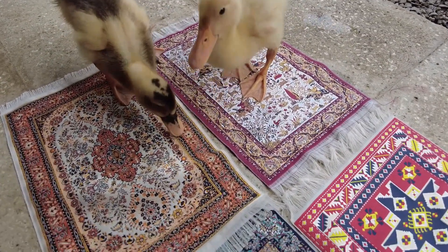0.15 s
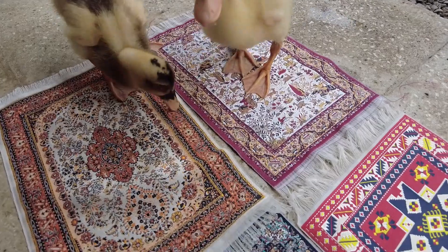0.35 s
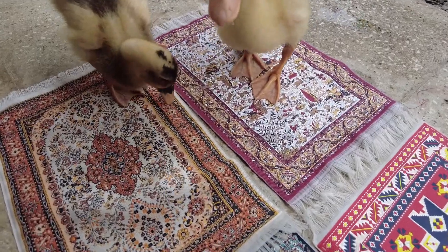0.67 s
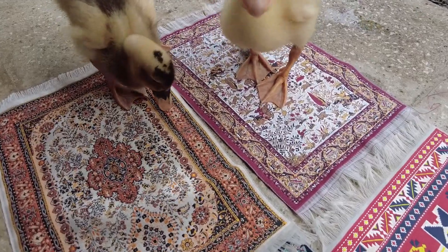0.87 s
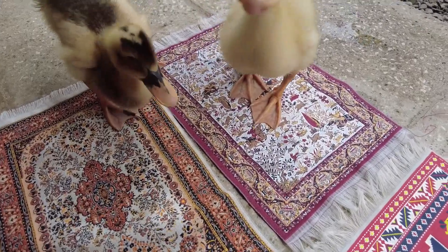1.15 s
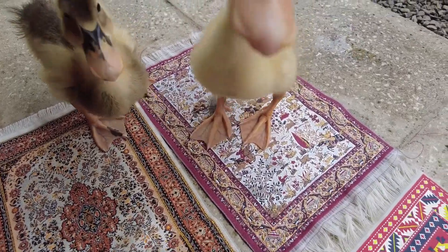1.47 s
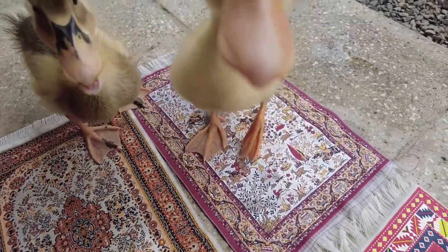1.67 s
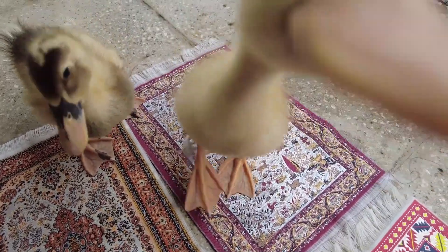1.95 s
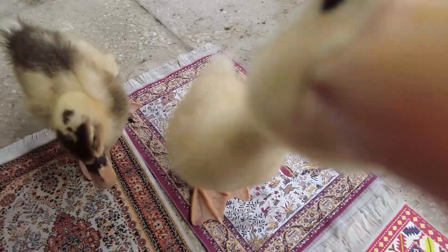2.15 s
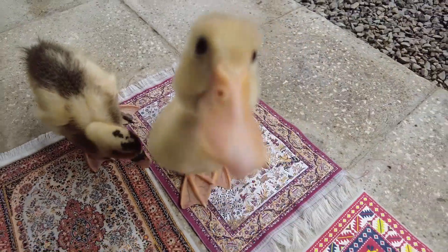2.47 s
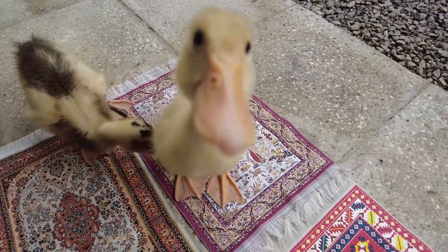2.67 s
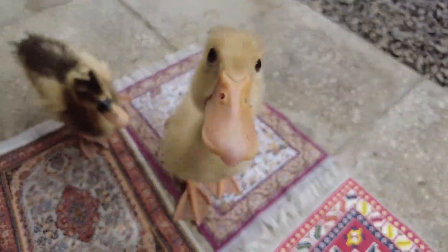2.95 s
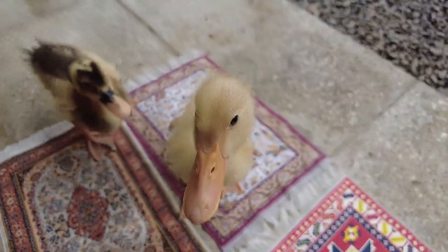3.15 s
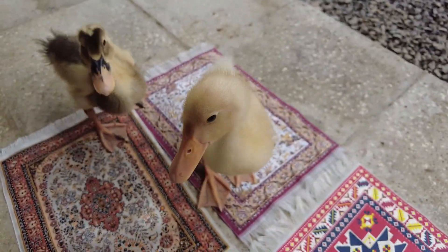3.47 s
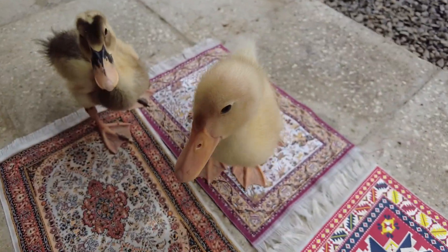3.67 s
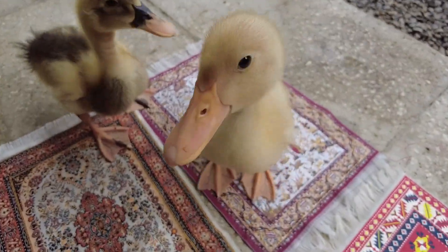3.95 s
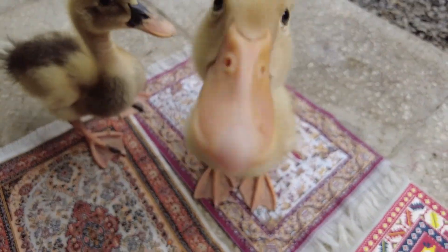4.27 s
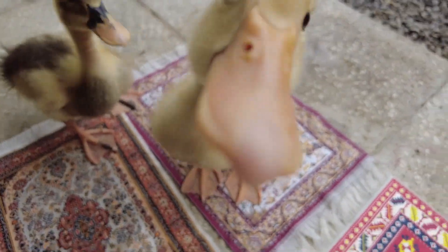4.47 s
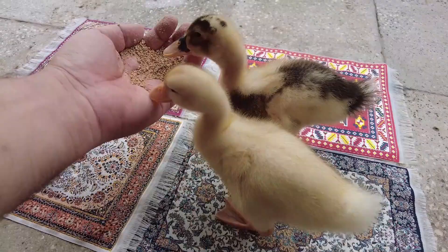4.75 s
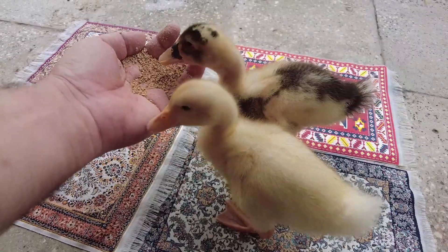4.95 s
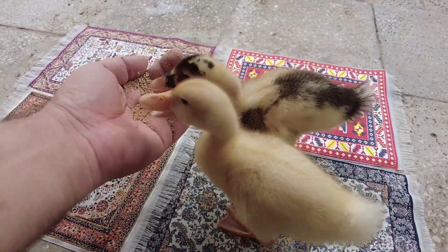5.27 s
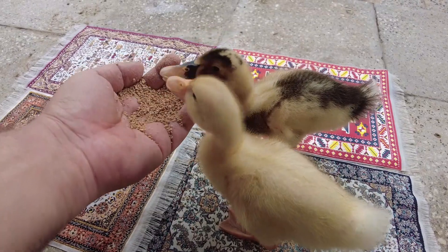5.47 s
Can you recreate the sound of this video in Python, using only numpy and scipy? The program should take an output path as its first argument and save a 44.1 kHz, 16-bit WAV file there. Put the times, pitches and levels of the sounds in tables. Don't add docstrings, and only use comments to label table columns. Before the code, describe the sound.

Rapid high duckling peeps, a knock on the phone, gentler scattered peeps with bill taps and rug rustles, then only faint breeze.

```python
import sys
import numpy as np
from scipy import signal
from scipy.fft import rfft, irfft, next_fast_len
from scipy.io import wavfile
from scipy.ndimage import uniform_filter1d

SR = 44100
rng = np.random.default_rng(int(sys.argv[2]) if len(sys.argv) > 2 else 0)


def elevation(decibels):
    levels = np.asarray(decibels, float)
    return 10 ** (levels / 20)


def dump_mix(stems):
    frames = np.atleast_2d(stems).T
    limited = np.clip(frames, -1, 1)
    pcm = np.round(limited * 32767).astype(np.int16)
    wavfile.write(sys.argv[1], SR, pcm)


N = 247842

# time_s, level_db
BREEZE = [(0.0, -68.5), (0.06, -50), (0.2, -63), (0.31, -52), (1.45, -47), (1.63, -53.5), (1.81, -47.5),
          (2.94, -50), (2.99, -46.5), (3.93, -51), (4.04, -39.5), (4.62, -58), (4.73, -45.5), (4.85, -53),
          (5.24, -53), (5.31, -49.5), (5.59, -57), (5.62, -62)]
# time_s, level_db
TRAFFIC = [(0, -57.5), (.6, -57.5), (1.95, -58.5), (2.11, -53.5), (2.2, -59), (2.45, -62), (3.07, -57),
           (3.6, -57.5), (3.72, -53.5), (3.88, -57), (5.62, -59.5)]
# freq_hz, level_db_per_hz
YARD_COLOUR = [(47, -42.5), (80, -3), (177, -6.5), (228, -9), (268, -11.5), (316, -15), (868, -22.5),
               (1080, -24), (1410, -17.5), (2140, -25), (3080, -28), (3620, -30), (6000, -39.5),
               (7800, -70.5), (13200, -120)]
# peak_s, peak_db, rise_db_per_s, fade_db_per_s
RUSTLES = [
    (.25, -75, 56.5, 11),
    (1.45, -72.5, 25.5, 43.5),
    (1.86, -70.5, 33.5, 110.5),
    (2.13, -67.5, 202.5, 200),
    (2.225, -63, 249.5, 249.5),
    (3.029, -61.5, 246.5, 53.5),
    (3.58, -65, 90, 60),
    (3.719, -71.5, 82.5, 132.5),
    (5.12, -80, 8, 87.5),
]
# freq_hz, level_db_per_hz
RUSTLE_COLOUR = [(3500, -5.5), (5000, -3), (7500, -3.5), (10000, -10), (13000, -14.5), (15500, -5.5)]
# freq_hz, likeness_0_1
LIKENESS = [(60, 0.952), (180, 0.95684), (550, 0.11), (1650, 0.33), (5000, 0.026), (8000, 0.092),
            (13000, 0.32)]
# start_s, end_s, start_hz, end_hz, level_db
FAR = [
    (0.3, 0.6047, 253.1, 247.2, -65),
    (1.0, 1.548, 247.2, 252, -59.5),
    (2.35, 3.4, 174, 168, -58),
    (4.94, 5.21, 3380, 3480, -70),
    (0, 5.62, 99, 100, -58.5),
    (0.037, 0.08316, 4300, 2300, -61),
    (1.035, 1.06, 5600, 5100, -70),
    (1.755, 1.82, 5440, 4760, -69.5),
]
# start_s, end_s, start_hz, end_hz, level_db
SCUFFS = [
    (5.04, 5.09, 1500, 1500, -59),
    (3.54, 3.65, 1500, 1200, -56),
]
# start_s, peak_db, ring_hz, t60_s
POPS = [
    (0.267, -47.5, 510.8, 0.055),
    (0.849, -44.5, 479.4, 0.06107),
    (1.229, -38, 473.6, 0.03147),
    (1.613, -39, 449.9, 0.026427),
    (1.711, -52, 499.3, 0.0722),
    (2.621, -42, 1461, 0.02709),
    (2.79, -50.5, 470.5, 0.03926),
    (4.569, -35.5, 1348, 0.0054),
    (4.743, -41, 1433, 0.01672),
]
# start_s, peak_db
TICKS = [(2.0951, -39.5), (2.3029, -36), (2.994, -36), (3.0205, -38), (3.0245, -33.5), (3.052, -35),
         (3.171, -45.5), (3.2095, -35), (3.237, -47), (3.383, -52.5), (3.489, -52.5), (2.6155, -57),
         (2.6215, -57.5), (3.657, -36), (3.696, -44.5), (3.7244, -32), (3.748, -35), (4.5665, -57.5),
         (4.571, -52), (4.7384, -61.5), (4.7425, -53.5), (4.8208, -47)]
# start_s, peak_db
CLAPS = [(3.652, -36), (3.6575, -27), (3.668, -40), (3.693, -44.5), (3.725, -36), (3.726, -27),
         (3.737, -32.5), (3.746, -36.5), (3.7476, -26), (2.122, -51), (3.549, -44)]
# ring_hz, level_db, t60_s
KNOCK = [
    (433.24, 2.5, 0.024975),
    (266.72, -12.5, 0.06914),
    (565, -56, 0.039),
    (109.01, -33.5, 0.0574),
    (1330.4, -16, 0.05937),
]
# start_s, end_s, first_hz, top_hz, crest_db
LARGER = [(0, 0.038, 3145, 3211, -52.5), (0.106, 0.209, 2317, 4207, -40.5),
          (0.267, 0.359, 2605, 3807, -27.5), (0.471, 0.546, 2041, 4200, -38.5),
          (0.677, 0.753, 2395, 4237, -38.5), (0.852, 0.937, 2534, 4396, -33.5),
          (1.063, 1.143, 1817, 4141, -33.5), (1.229, 1.314, 2800, 4473, -30),
          (1.437, 1.518, 1955, 4147, -34.5), (1.613, 1.698, 2544, 4322, -29.5),
          (1.823, 1.901, 1728, 4173, -33), (2.187, 2.251, 1917, 3239, -43), (2.445, 2.521, 1848, 3198, -37),
          (2.626, 2.702, 2087, 3291, -37.5), (2.792, 2.87, 1931, 3356, -36.5),
          (3.386, 3.457, 1934, 3199, -45), (3.528, 3.631, 1605, 3301, -39),
          (3.696, 3.781, 2197, 3365, -44.5), (3.917, 3.989, 1906, 3415, -40.5),
          (4.393, 4.467, 1728, 3252, -38), (4.574, 4.655, 1942, 3490, -35.5),
          (4.748, 4.822, 2022, 3443, -36)]
# crest_share_0_1, last_hz
LARGER_LEAN = [(0.2, 1900), (0.54, 1500), (.56, 1500), (.51, 1800), (.49, 1800), (0.56, 1750), (.52, 1750),
               (.55, 1600), (.53, 1100), (.52, 1200), (0.7, 1500), (.52, 1500), (.55, 1600), (0.63, 1547),
               (0.58, 1736.6), (.45, 1633), (.7, 1328.7), (.52, 1700), (.48, 1750), (.52, 1750),
               (0.5, 1800), (.52, 1893.8)]
# start_s, end_s, first_hz, top_hz, crest_db
SMALLER = [(0.502, 0.553, 1627, 1973, -40.5), (0.684, 0.726, 1676, 1995, -40),
           (1.386, 1.454, 1404, 2490, -37.5), (1.541, 1.612, 1615, 2679, -38),
           (1.715, 1.776, 1399, 2561, -34), (1.863, 1.918, 2176, 2733, -29.5),
           (2.034, 2.095, 1396, 2881, -40), (2.193, 2.247, 1866, 2703, -48.5),
           (3.02, 3.08, 1598, 2488, -41), (3.363, 3.425, 1281, 2650, -42), (3.54, 3.581, 2381, 2659, -39),
           (4.051, 4.124, 1280, 2431, -46), (4.207, 4.278, 1560, 2774, -38.5),
           (4.359, 4.421, 1527, 2822, -37), (4.596, 4.665, 1494, 2567, -42.5),
           (4.75, 4.819, 1946, 2750, -41.5)]
# crest_share_0_1, last_hz
SMALLER_LEAN = [(0.4853, 1400), (0.31, 1367), (.49, 1400), (.45, 1200), (0.45, 1501), (0.75, 1686.4),
                (.51, 710), (0.16, 1000), (0.54, 1100), (0.64, 1100), (0.5066, 1600), (0.52, 890),
                (.42, 1400), (0.42, 1200), (0.38, 1234.6), (0.4127, 1200)]
# moment_s, cavity_hz, rasp_db, swell_db (through the peep), rasp_pitch_hz
RASPS = [
    (.15, 3058, -42, 9.5, 3297),
    (.49, 3187, -40.5, -1.5, 3135),
    (.73, 3139, -40, -4, 3155),
    (.9, 3348, -34, 4.5, 3043),
    (1.1, 3135, -36, 0, 3300),
    (1.27, 3413, -31, -2.5, 3280),
    (1.48, 3225, -34.5, -10.5, 3275),
    (1.65, 3511, -30, -8.5, 3156),
    (1.85, 3148, -29, -2, 3342),
]
# centre_s, length_s, rasp_db, swell_db (through the peep), whistle_change_db
BREAKS = [
    (.006, 0.01883, -36, 2, -5.5),
    (.315, 0.022853, -33, 12, -3.5),
    (2.47, 0.0226, -35.5, -6, 0.5),
    (2.668, 0.02507, -34, -5, -5.5),
    (2.835, 0.020897, -27, 1.5, -15.5),
    (3.42, 0.023706, -39.5, 4.5, -3.5),
    (3.575, 0.052436, -36, -2.5, -0.5),
    (3.737, 0.020886, -24, -0.5, 2.5),
    (3.953, 0.020684, -29.5, -3, 3.5),
    (4.424, 0.03242, -34, -5, 1),
]
# moment_s, level_db, pitch_ratio (re whistle)
SIDE_TONES = [(1.42, -56, 1.62), (1.745, -49, 1.5), (1.89, -44, 1.45), (2.065, -57, 1.5), (3.05, -56, 1.5),
              (3.395, -52, 1.23), (4.245, -52, 1.45), (4.39, -56, 1.35)]
# moment_s, manner
ODD = [(2.22, "pointed"), (3.43, "pointed"), (3.6, "long")]
# moment_s, up_db, down_db, cling_down_hz, cling_up_hz
FLARES = [(.15, 9.5, -1, 390, 780), (.3, 4.5, 3.5, 12, 10), (.49, 9, 7.5, 403.8, 380),
          (.73, 8, 11.5, 436.8, 420), (.9, 9.5, 7.5, 328.94, 300), (1.1, 8.5, 0.5, 277.9, 120),
          (1.27, 2.5, 5.5, 450, 250), (1.48, 6, 7, 410, 480), (1.65, 2.5, 2.5, 380, 530),
          (1.85, 8, 10.5, 35.2, 300), (2.23, -1.5, -7, 10, 10), (2.48, -1.5, -5.5, 9.13, 10),
          (2.66, 2, -1, 8, 10), (2.83, 2, -2.5, 8.5, 10), (3.44, 5.5, 6.5, 10, 10), (3.62, 4, 5.5, 10, 10),
          (3.74, 6.5, 4, 10, 10), (3.95, 3.5, 0, 10, 10), (4.43, 2, 4, 9.44, 10), (4.585, 5, 5.5, 10, 10),
          (4.751, 4.5, 3, 10, 10)]
ARCH = {"rasping": (1.7, 1.9), "gentle": (2.2, 1.9), "small": (2.3, 1.9), "clear": (2.6, 2.3),
        "ringing": (2.4, 1.8465), "pointed": (1.3, 1.4), "long": (4.5, 1.3734), "low": (3.2, 1.7)}
EFFORT_AT = [.04, .18, .36, .64, .82, .96]
EFFORT = {"rasping": (-2, -1, 7, 9.5, 4, -11), "gentle": (2, 2.5, -0.5, 0.5, 2.5, -2),
          "small": (-5.5, -6, 0.5, -0.5, -9.5, -6), "clear": (7.5, 1, -1.5, -2.5, -0.5, 2),
          "ringing": (-15, -4.5, 5.5, 9, -9, -28), "pointed": (3.5, 4, -0.5, 3.5, 2, -5.5),
          "long": (-5.5, -4.5, 1, -3, -3, -10.5), "low": (1.5, -9.5, -2, -8, -5.5, -15.5)}
COLOUR = {"rasping": (-21, 0.31, -22), "gentle": (-29.5, 1, -24), "small": (-35.5, 0.82, -38),
          "clear": (-32.5, 1, -27), "ringing": (-24, 0.48, -28.5), "pointed": (-33.5, 0.73, -29.5),
          "long": (-22.5, 0.71, -33), "low": (-31, .6, -31.5)}
# freq_hz, level_db
OVERTONES = [(3000, -3.5), (5000, -6), (6000, -9.5), (7400, -2.5), (9000, -15), (13000, -26)]
# freq_hz, level_db_per_hz
HISS = [(4800, -1), (5800, -20.5), (6700, 4.5), (7100, 3.5), (7700, 11.5), (8500, -7), (9300, -3),
        (11500, -10), (15300, -3)]
# time_s, level_db
BREATH = [(0, 0.5), (.3, 3.5), (1.2, 4), (1.7, 8), (2.2, -10), (2.6, -5), (3.3, -2), (3.6, 6), (4.8, -15)]
# time_s, left_right_db, left_lead_samples
LARGER_PLACE = [(.1, -1, 1.959), (.28, -0.0236, 1.3336), (.48, 0.7754, 1.344), (.7, 0.5, 1.16),
                (1.07, -0.5, 1.425), (1.23, -0.2743, 1.328), (1.62, -1, 0.9833), (1.83, -0.9843, 1.191),
                (2.2, 1.5, 3.444), (2.45, -0.6577, 0.86), (2.8, -0.52, 1.2395), (3.7, 0, 2.1814),
                (3.92, 0, 1.2364), (4.4, -1.03, 0.9074), (4.75, -1, 1.149)]
# time_s, left_right_db, left_lead_samples
SMALLER_PLACE = [(1.39, 0.5, 2.172), (1.55, 1.1675, 2.402), (1.71, 3.5, 2.821), (2.04, 0.5, 2.5506),
                 (3.031, 1.5, 4.086), (3.37, 0, 2.559), (4.06, -0.314, 1.567), (4.21, 0.6773, 2.322)]
# time_s, overtones_db, loss_db_per_overtone
FACING = [(.6, -44.5, 2), (1.42, -25.5, 8), (1.57, -36.5, 7.5), (1.74, -22.5, 2.5), (1.89, -20.5, -3),
          (2.06, -24.5, 8.5), (2.22, -13.5, 20), (3.05, -28, -1.5), (3.4, -20, 6.5), (3.56, -39.5, 3.5),
          (4.09, -16.5, 8.5), (4.24, -25.5, 9), (4.39, -30.5, 6.5), (4.62, -23.5, 3.5), (4.78, -38, 8.5)]

BREAK_HZ, OPEN_CAVITY_HZ = 3550, 4108
CLEAR_RASP_DB = -31


def rms_one(x):
    return x / np.sqrt(np.mean(x ** 2) + 1e-20)


def at_hz(points, hz):
    points_hz, values = np.transpose(points)
    return np.interp(np.log(hz), np.log(points_hz), values)


def in_time(rows):
    return np.interp(np.arange(N) / SR, *np.transpose(rows))


def within(rows, start_s, end_s):
    return next((row for row in rows if start_s < row[0] < end_s), None)


def later(x, samples):
    size = next_fast_len(len(x) + 64)
    turn = np.exp(-2j * np.pi * np.fft.rfftfreq(size) * samples)
    return irfft(rfft(x, size) * turn, size)[:len(x)]


def drift(rate_hz, size=N):
    r = np.exp(-2 * np.pi * rate_hz / SR)
    white = rng.standard_normal(size + 9000)
    return rms_one(signal.lfilter([1], [1, -2 * r, r * r], white)[9000:])


def cavity(x, hz, width_hz, db):
    r = np.exp(-np.pi * width_hz / SR)
    a = [1, -2 * r * np.cos(2 * np.pi * hz / SR), r * r]
    once = signal.lfilter([1, 0, -1], a, x)
    return elevation(db) * rms_one(signal.lfilter([1, 0, -1], a, once))


def ring(start_s, db, hz, t60_s):
    out, first = np.zeros(N), round(start_s * SR)
    t = np.arange(round(2 * t60_s * SR)) / SR
    sine = elevation(db - 60 * t / t60_s) * np.sin(2 * np.pi * hz * t)
    out[first:first + len(t)] = sine[:N - first]
    return out


def coloured(spectrum, patchy_db):
    size = next_fast_len(N)
    hz = np.maximum(np.fft.rfftfreq(size, 1 / SR), 1)
    alike = np.clip(at_hz(LIKENESS, hz), 0, 1)
    shape = elevation(at_hz(spectrum, hz)) * (hz > spectrum[0][0] * .7) * (hz < 16800)
    mid, side = rfft(rng.standard_normal((2, size))) * shape
    pair = np.sqrt(1 + alike) * mid + np.sqrt(1 - alike) * side * [[1], [-1]]
    band, out = np.round(2 * np.log2(hz)), 0
    for k in np.unique(band[shape > 0]):
        flicker = np.repeat(drift(600, size=N // 64 + 1), 64)[:N]
        out = out + irfft(pair * (band == k), size)[:, :N] * elevation(patchy_db * flicker)
    return rms_one(out)


def breeze():
    band = signal.butter(2, [18, 46], "band", fs=SR, output="sos")
    common, unlike = signal.sosfilt(band, rng.standard_normal((2, N)))
    thumps = rms_one(common) * elevation([[-1.1], [1.1]]) + .1 * rms_one(unlike) * [[1], [-1]]
    return elevation(in_time(BREEZE)) * thumps


def traffic():
    return elevation(in_time(TRAFFIC) + 1.5) * coloured(YARD_COLOUR, patchy_db=1.8)


def rustle_and_air():
    t = np.arange(N) / SR
    swells_db = [db - np.maximum(rise * (s - t), fade * (t - s)) for s, db, rise, fade in RUSTLES]
    rustle_db = np.maximum(np.max(swells_db, axis=0), -85.5)
    crackle = elevation(2.2 * drift(250) + 1.5 * drift(25))
    rustle = coloured(RUSTLE_COLOUR, patchy_db=1.5) * crackle
    air = signal.lfilter(*signal.butter(1, 8841.9, fs=SR), rustle[:, ::-1])
    return elevation(rustle_db + 5.0) * rustle + elevation(-76) * air


def far_sounds():
    out = np.zeros((2, N))
    lines = [(*row, .02) for row in FAR] + [(*row, .14) for row in SCUFFS]
    for start_s, end_s, start_hz, end_hz, db, waver in lines:
        span = slice(round(start_s * SR), round(end_s * SR))
        size = span.stop - span.start
        phase = 2 * np.pi * np.cumsum(np.linspace(start_hz, end_hz, size)) / SR
        width_hz = waver * start_hz
        steady = 5 * (start_hz < 300)
        scale = np.hypot(1, steady)
        one = (steady + drift(width_hz, size=size)) / scale * np.sin(phase)
        two = drift(width_hz, size=size) / scale * np.cos(phase)
        out[:, span] += elevation(db) * signal.windows.tukey(size, .4) * (one + two * np.array([[1], [.3]]))
    return out


def walls(x):
    t = np.arange(round(.7 * SR)) / SR
    decay = elevation(-60 * t / .1206) + elevation(-9.5 - 60 * t / .41643)
    tail = rng.standard_normal((2, len(t))) * decay * (t > .008)
    tail = signal.sosfilt(signal.butter(1, 5000, fs=SR, output="sos"), tail + .3 * tail[::-1])
    tail = rms_one(tail) + cavity(tail, hz=2950, width_hz=1100, db=-6)
    tail = tail / np.sqrt(np.sum(tail ** 2, 1, keepdims=True))
    return signal.fftconvolve(x.mean(0, keepdims=True), tail)[:, :N]


def phone_knock(crack):
    start_s, peak_db = 2.0945, -25.5
    modes = sum(ring(start_s, peak_db + db, hz, t60_s) for hz, db, t60_s in KNOCK)
    modes = modes - ring(start_s, peak_db + .64, 445.5, .00668)
    modes = signal.lfilter([.12], [1, -.88], modes) * elevation(6.0)
    body = cavity(crack[1], 400.83, 163, -6.0) + cavity(crack[2], 2005.2, 700, -13.5)
    knock = modes + body * abs(ring(start_s, -25.5, 10.26, .1184))
    return np.array([knock, np.roll(knock, 12)]) * elevation([[.4], [-.4]])


def bills():
    crack = rng.standard_normal((3, N))
    pops = sum(ring(*row) for row in POPS)
    puff_shape = sum(abs(ring(s, db, 45, .0079)) for s, db, _, _ in POPS)
    puff = cavity(crack[0], 2800, 1300, 1.6) * puff_shape
    claps = sum(ring(s, db + 6.0, 1282.6, .013802) - ring(s, db + 6.5, 1282.6, .005665) for s, db in CLAPS)
    ticks = sum(ring(s, db - 9.0, 11560, .012174) for s, db in TICKS)
    ticks = ticks * (crack[0] + 1.052 * crack[1:])
    return np.array([np.roll(pops, 8), pops]) + puff + claps + phone_knock(crack) + ticks


def smaller_peeps():
    for row, lean in zip(SMALLER, SMALLER_LEAN):
        doubling = within(SIDE_TONES, *row[:2])
        manner = "low" if row[3] < 2100 else "small"
        ratio = doubling[2] if doubling else 1.5
        rasp_db = doubling[1] if doubling else row[4] + CLEAR_RASP_DB
        yield row + lean, manner, OPEN_CAVITY_HZ * ratio, rasp_db, 0, None


def larger_peeps():
    for row, lean in zip(LARGER, LARGER_LEAN):
        rasp, snap, odd = [within(rows, *row[:2]) for rows in (RASPS, BREAKS, ODD)]
        if rasp:
            yield row + lean, "rasping", *rasp[1:4], None
        elif snap:
            manner = "ringing" if row[3] > BREAK_HZ else "gentle"
            yield row + lean, odd[1] if odd else manner, OPEN_CAVITY_HZ, *snap[2:4], snap
        else:
            yield row + lean, odd[1] if odd else "clear", OPEN_CAVITY_HZ, row[4] + CLEAR_RASP_DB, 0, None


def arch(share, first_hz, top_hz, manner, crest, last_hz):
    rise, fall = ARCH[manner]
    over_hz = 341 * (manner == "gentle")
    give = .19
    up = np.clip(1 - share / crest, 0, 1)
    down = np.clip((share - crest) / (1 - crest), 0, 1)
    held_hz = top_hz - give * over_hz
    aim_hz = held_hz + over_hz
    free = aim_hz - (aim_hz - first_hz) * up ** rise - (aim_hz - last_hz) * down ** fall
    return np.minimum(free, held_hz + give * (free - held_hz)) if over_hz else free


def cling(share, free, cavity_hz, top_hz, flare):
    reach_hz = np.where(share < .5, flare[4], flare[3])
    clings = (free > cavity_hz) & (free < cavity_hz + reach_hz)
    above = top_hz - np.where(share < .5, .5, .75) * (top_hz - free)
    locked = np.where(clings, cavity_hz, np.where(free > cavity_hz, above, free))
    return uniform_filter1d(locked, size=70), clings


def roughness(hz, free, cavity_hz):
    broken = np.clip((hz - min(BREAK_HZ, hz.max() - 146.2)) / 120 + .5, 0, 1)
    broken = np.maximum(broken, .54 * np.clip((free - cavity_hz) / 150, 0, 1))
    return uniform_filter1d(broken, size=260)


def onset(share, start_s, end_s, first_hz, rasping):
    t = share * (end_s - start_s)
    popped = first_hz > 2500 and within(POPS, start_s - .012, start_s + .005)
    attack, release = .0052 if popped else .0894, .06069
    edge = np.clip(np.minimum(share / attack, (1 - share) / release), 0, 1)
    catching = np.clip(2 - 2 * t / .010718, 0, 1) * bool(popped or rasping and first_hz > 2500)
    return edge * (1 - .68 * catching * np.cos(np.pi * 202.12 * t) ** 2), catching


def cavity_lift_db(share, hz, free, cavity_hz, flare, rasping):
    throat_hz, throat_width_hz, throat_db = 3091.5, 1189.4, 6.444
    flare_hz, width_hz = (cavity_hz - 117.33, 416.15) if rasping else (3202.1, 208.85)
    throat = throat_db / (1 + (2 * (hz - throat_hz) / throat_width_hz) ** 2)
    lag_hz = np.where(share < .5, 0, .5 * flare[3])
    return throat + np.where(share < .5, *flare[1:3]) * np.exp(-((free - lag_hz - flare_hz) / width_hz) ** 2)


def overtones(phase, hz, start_s, manner, crest_db, noise):
    if manner in ("small", "low"):
        time_s, *columns = np.transpose(FACING)
        facing_db, loss_db = [np.interp(start_s + .03, time_s, c) for c in columns]
        tones = sum(elevation(facing_db - max(loss_db, 2) * (k - 2)) * np.sin(k * phase) for k in (2, 3, 4, 5, 6))
        flank_power = 1.5
    else:
        over_db = COLOUR[manner][0] - COLOUR[manner][1] * (crest_db + 38)
        tones = sum(elevation(over_db + at_hz(OVERTONES, k * hz) - 3.0475 * (k - 4)) * np.sin(k * phase)
                    for k in (2, 3, 4))
        flank_power = 4.44
    flicker_db = 3.6 * noise["shimmer_back"] + 2.2 * noise["waver"]
    return tones * (hz / hz.max()) ** flank_power * elevation(flicker_db)


def cavity_ringing(hz, free, top_hz, cavity_hz, rasp, snap, noise):
    passed = free.max() > cavity_hz
    kind = "bursts" if passed else "smooth"
    rung_hz = rasp[4] if rasp else cavity_hz
    rung_hz = rung_hz + (hz - top_hz if snap else 80 * noise["wander"])
    ringing = np.real(noise[kind] * np.exp(2j * np.pi * np.cumsum(rung_hz) / SR))
    if snap:
        lower = np.exp(2j * np.pi * np.cumsum(2 * hz - rung_hz) / SR)
        ringing += elevation(-8) * np.real(noise[kind + "_back"] * lower)
    return ringing * elevation(-1.5 if passed else -8.5)


def peep(noise, row, manner, cavity_hz, rasp_db, swell_db, snap):
    start_s, end_s, first_hz, top_hz, crest_db, *lean = row
    share = np.linspace(0, 1, round(end_s * SR) - round(start_s * SR))
    small, rasping = manner in ("small", "low"), manner == "rasping"

    free = arch(share, first_hz, top_hz, manner, *lean)
    flare = not small and within(FLARES, start_s, end_s) or (0, 0, 0, 0, 0)
    hz, clings = cling(share, free, cavity_hz, top_hz, flare)
    jump = np.clip(np.abs(np.gradient(hz)) / 2 - 2, 0, 1) * rasping
    jump = signal.fftconvolve(jump, np.hanning(200) / 70, "same")
    held = uniform_filter1d(clings * (free > cavity_hz + 150) * (share < .5) * 1., size=200)
    broken = roughness(hz, free, cavity_hz)
    if snap:
        centre_s, length_s = snap[:2]
        broken = np.exp(-(2 * (start_s + share * (end_s - start_s) - centre_s) / length_s) ** 4)
        hz = hz - 49.49 * broken
        cavity_hz = top_hz + (1300 if manner == "ringing" else 680)

    edge, catching = onset(share, start_s, end_s, first_hz, rasping)
    level_db = crest_db - 2.5 + np.interp(share, EFFORT_AT, EFFORT[manner]) + swell_db * (share - .5)
    level_db = level_db + cavity_lift_db(share, hz, free, cavity_hz, flare, rasping)
    level_db = level_db + (snap[4] if snap else 0) * broken
    if small:
        level_db = level_db - 2.5 * (top_hz - hz) / 1e3
    else:
        level_db = level_db - 3.5 * np.maximum(2800 - hz, 0) / 1e3
    level_db = level_db - 9 * jump - .5 * held
    level = elevation(level_db) * edge

    unsteady = np.clip(elevation(rasp_db) / level.mean(), 0, 1) * broken * (1 if rasping else .55)
    phase = 2 * np.pi * np.cumsum(hz) / SR
    phase = phase + (.05 if small else .09 + .9 * unsteady) * noise["waver"]
    shake_db = ((1.2 if small else 1.3) + .34 * unsteady) * noise["shimmer"]
    shake_db = shake_db + 3.5 * unsteady * noise["waver_back"] - 18.79 * unsteady
    tones = np.sin(phase) + overtones(phase, hz, start_s, manner, crest_db, noise)
    whistle = level * elevation(shake_db) * tones

    if small:
        ringing = elevation(4.5) * np.abs(noise["smooth"]) * np.sin(cavity_hz / OPEN_CAVITY_HZ * phase)
    else:
        rasp = within(RASPS, start_s, end_s) if rasping else None
        ringing = cavity_ringing(hz, free, top_hz, cavity_hz, rasp, snap, noise)
    rung = ringing + noise["chest"] * elevation(-1.5 * bool(snap)) + noise["bill"] * rasping
    voice = np.sqrt(2) * whistle + elevation(rasp_db) * broken * rung
    voice += elevation(crest_db - 9) * catching * edge * noise["puff"]
    squared = voice ** 2 - uniform_filter1d(voice ** 2, size=120)
    voice += elevation(-22.5) * broken * np.clip(unsteady * .75, 0, 1) * squared / level.max()

    hiss_db = COLOUR[manner][2] + crest_db + np.interp(start_s, *np.transpose(BREATH))
    breath = elevation(hiss_db) * (.5 * np.sin(np.pi * share) + broken) * noise["hiss"]
    return voice, breath


def at_ports(voice, start_s, rows):
    time_s, *columns = np.transpose(rows)
    pan_db, lead_samples = [np.interp(start_s, time_s, c) for c in columns]
    bounce = elevation(-31) * later(voice, 37.136)
    left = voice * elevation(pan_db / 2) + bounce
    right = later(voice, lead_samples) * elevation(-pan_db / 2) - bounce
    return np.array([left, right])


def duckling_noise():
    white = rng.standard_normal((3, N))
    noise = {
        "bill": cavity(white[0], hz=3700, width_hz=180, db=-12),
        "chest": cavity(white[1], 1756, 1385, -17) + cavity(white[2], 580, 249, -31),
        "puff": cavity(white[2], hz=2996, width_hz=802, db=0),
        "hiss": coloured(HISS, patchy_db=2.5),
        "waver": drift(350),
        "shimmer": drift(120),
        "wander": drift(30),
        "bursts": (drift(320) + 1j * drift(320)) * elevation(.96 * drift(90)),
        "smooth": .029 + .37624 * (drift(137.84) + 1j * drift(170)),
    }
    for name in ("waver", "shimmer", "bursts", "smooth"):
        noise[name + "_back"] = noise[name][::-1]
    return noise


def ducklings():
    out, noise = np.zeros((2, N)), duckling_noise()
    for peeps, place in ((smaller_peeps(), SMALLER_PLACE), (larger_peeps(), LARGER_PLACE)):
        for row, *settings in peeps:
            span = slice(round(row[0] * SR), round(row[1] * SR))
            local = {name: x[..., span] for name, x in noise.items()}
            voice, breath = peep(local, row, *settings)
            out[:, span] += breath + at_ports(voice, row[0], place)
    return out


def scene():
    background = breeze() + traffic() + rustle_and_air() + far_sounds()
    near = bills() + ducklings()
    echoes = elevation(-25) * walls(near) * (np.arange(N) < 4.823 * SR)
    return background + near + echoes


def band_limit(x):
    return signal.sosfilt(signal.butter(12, 16870, fs=SR, output="sos"), x)


def record(dry):
    low_pass = signal.cheby2(10, 32, 16050, fs=SR, output="sos")
    mix = signal.sosfilt(low_pass, dry)
    return band_limit(mix)


dry = scene()
out = record(dry)
dump_mix(out)
```